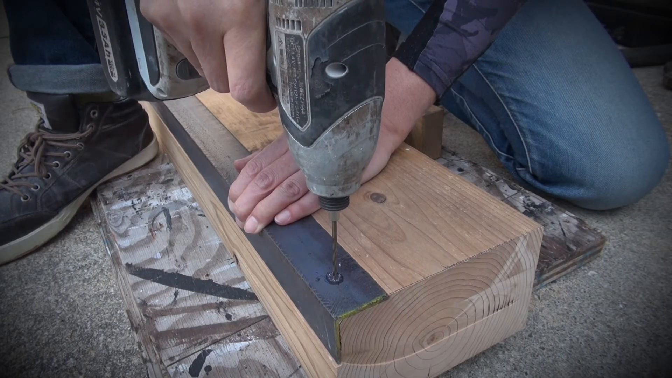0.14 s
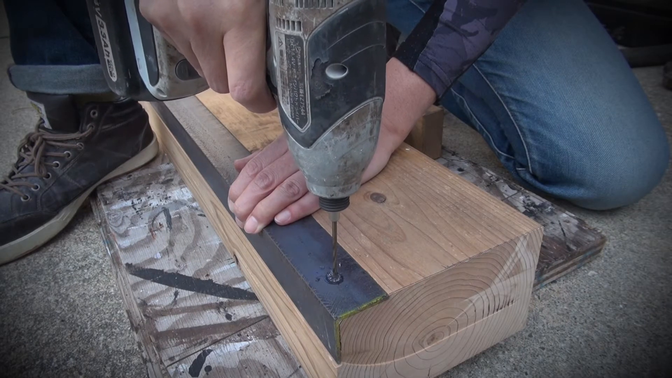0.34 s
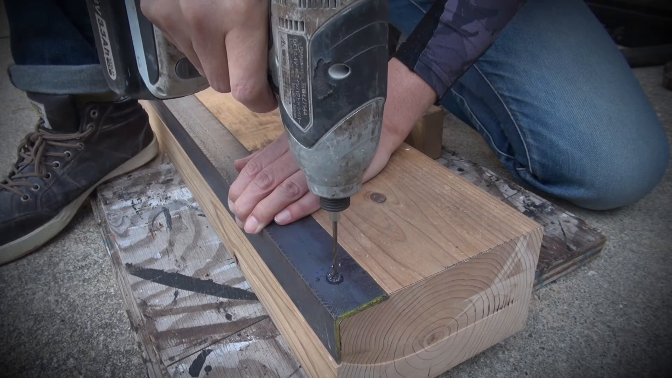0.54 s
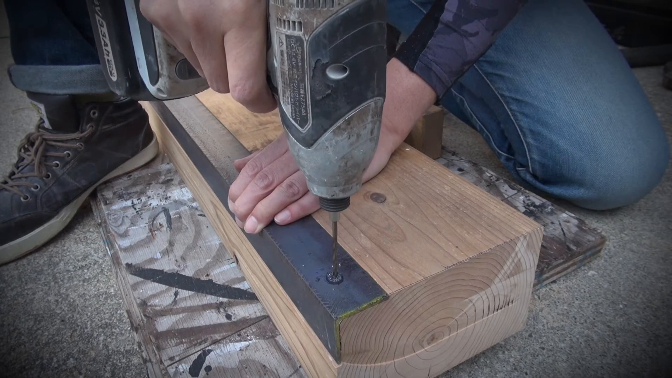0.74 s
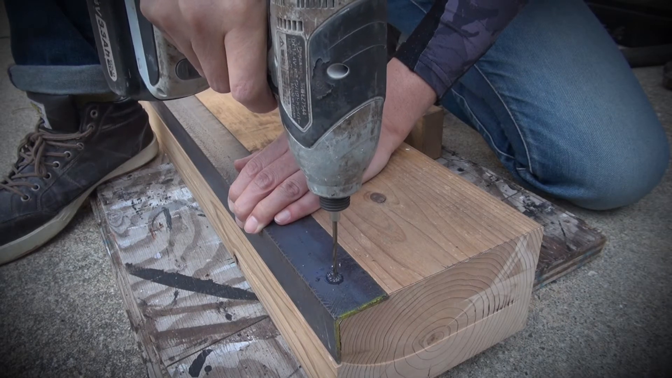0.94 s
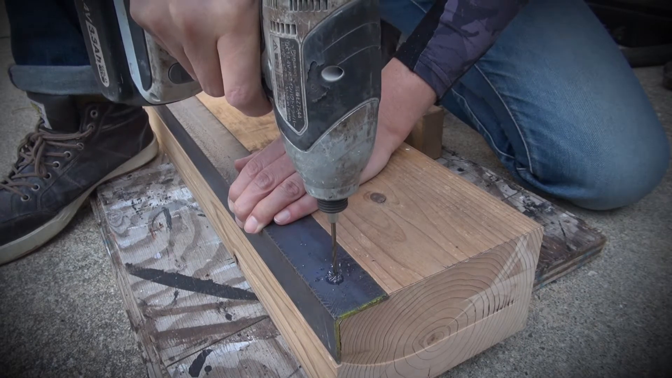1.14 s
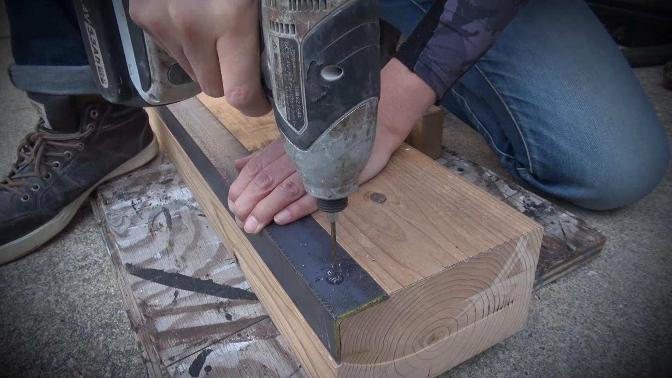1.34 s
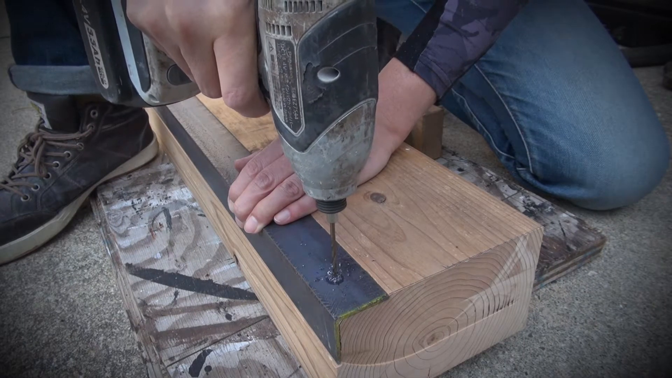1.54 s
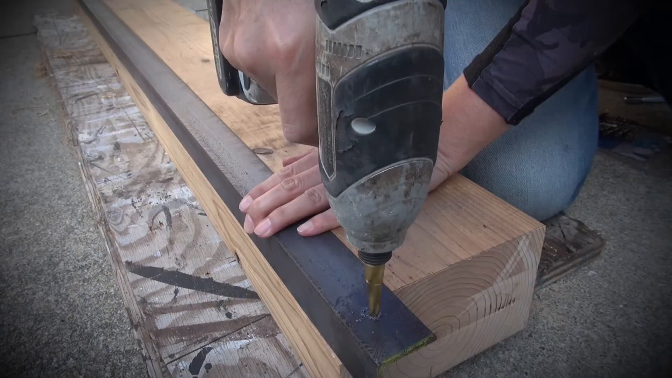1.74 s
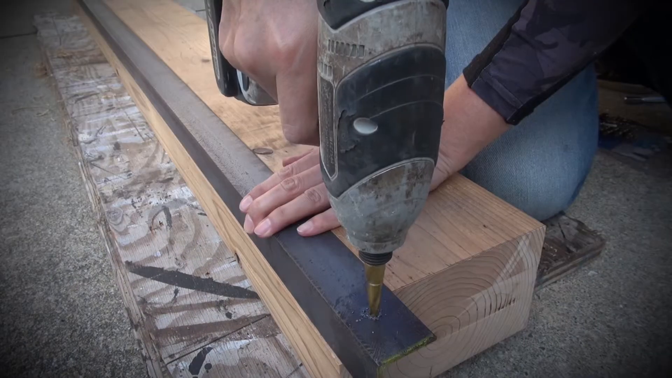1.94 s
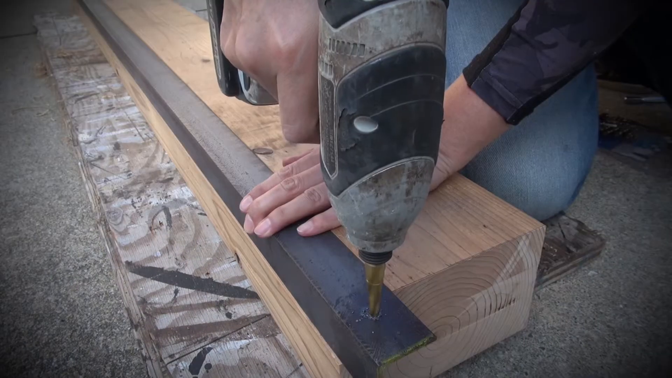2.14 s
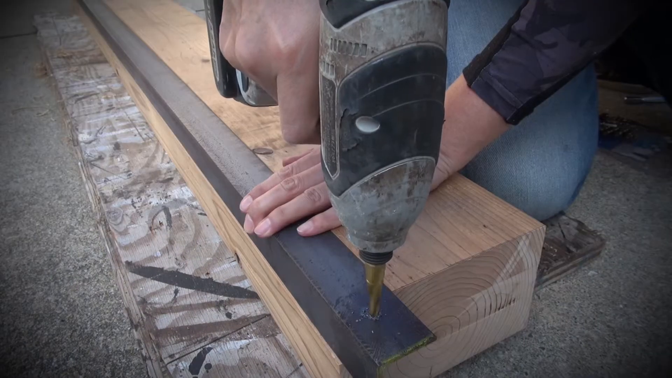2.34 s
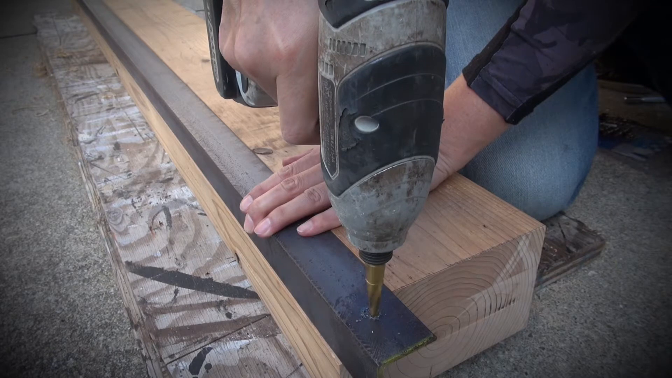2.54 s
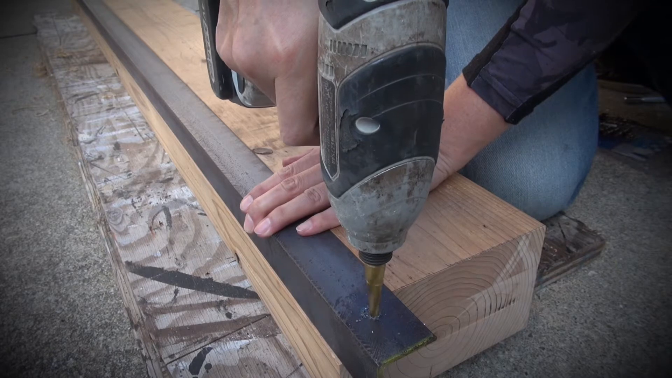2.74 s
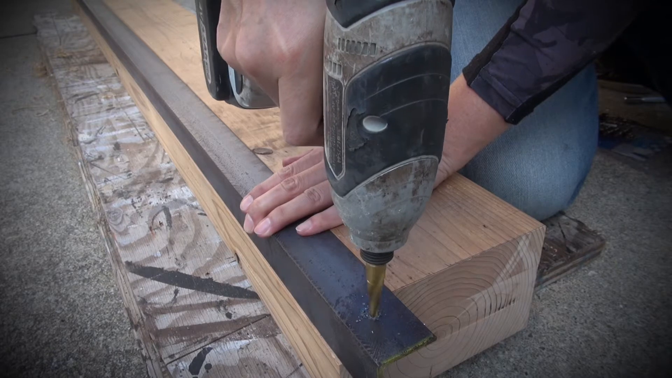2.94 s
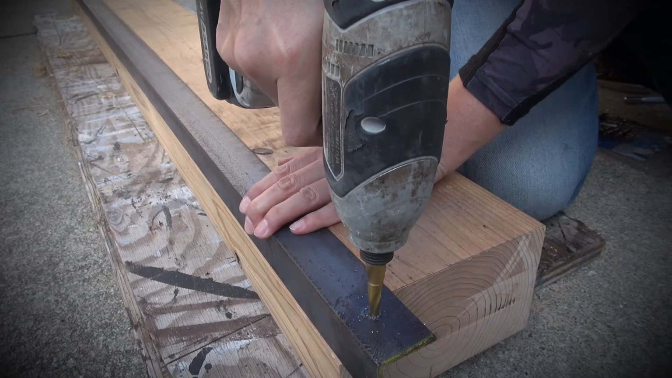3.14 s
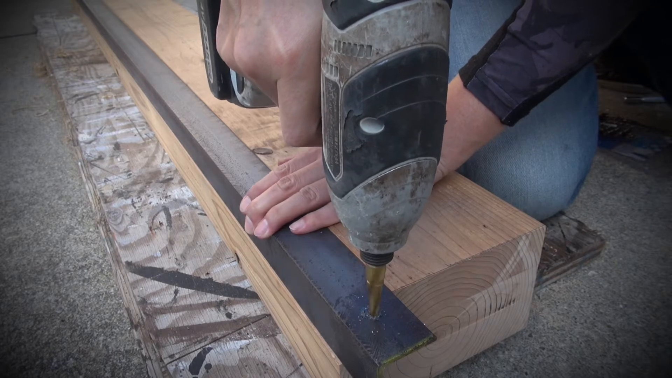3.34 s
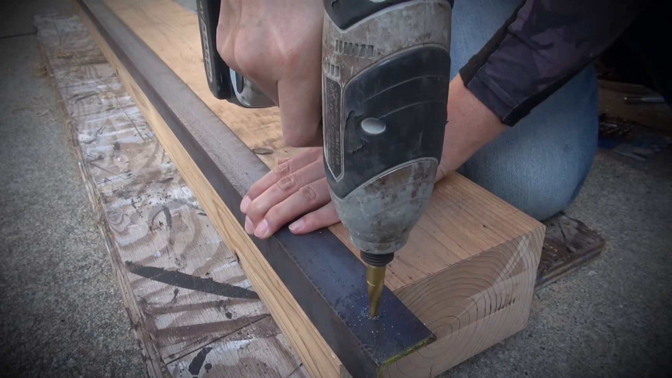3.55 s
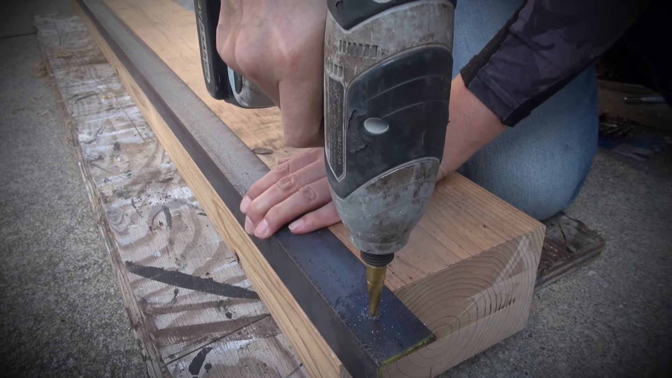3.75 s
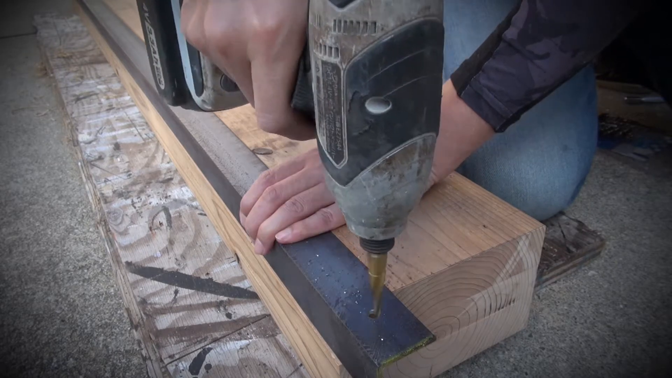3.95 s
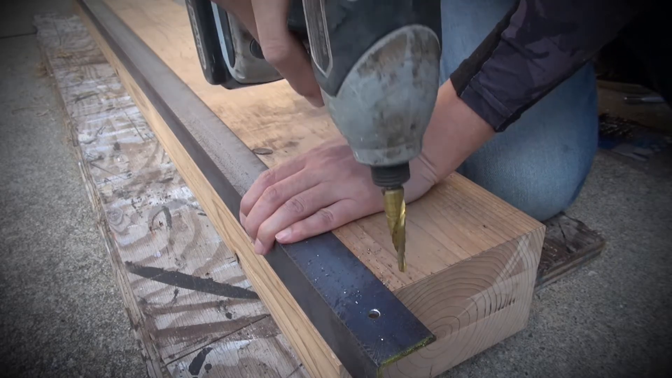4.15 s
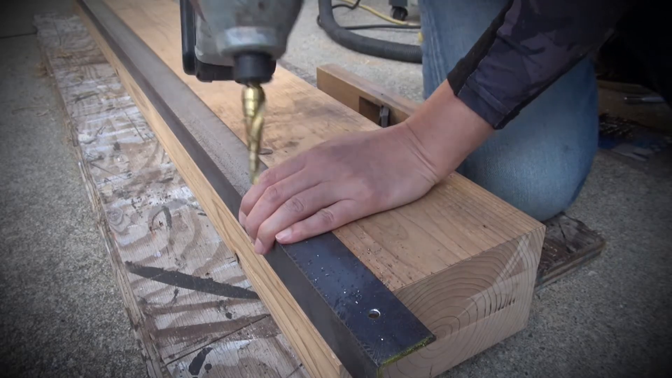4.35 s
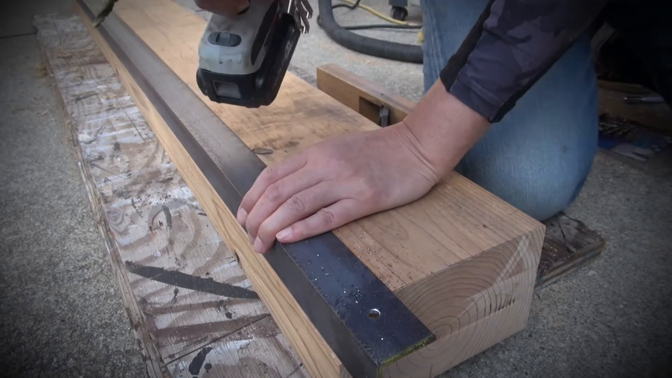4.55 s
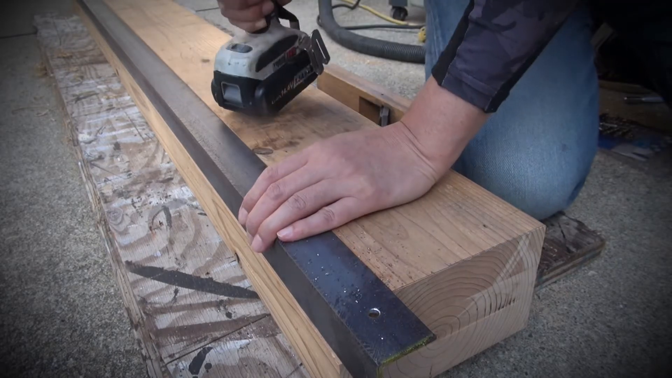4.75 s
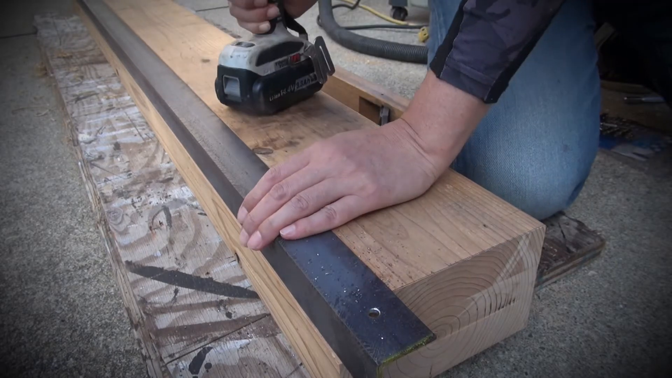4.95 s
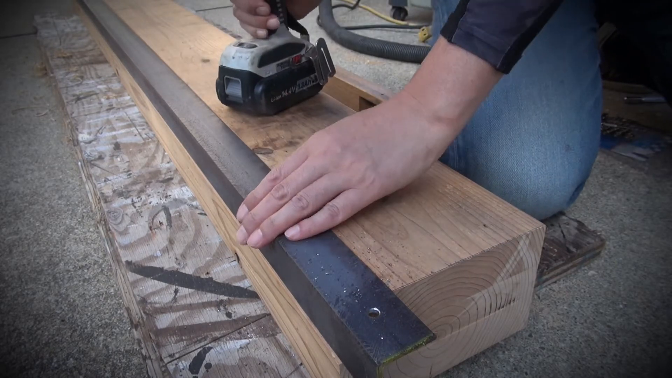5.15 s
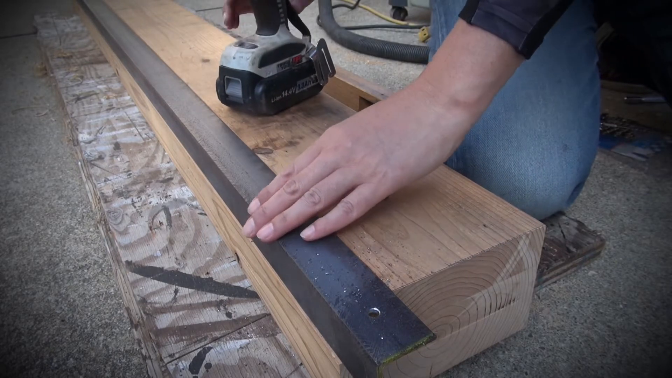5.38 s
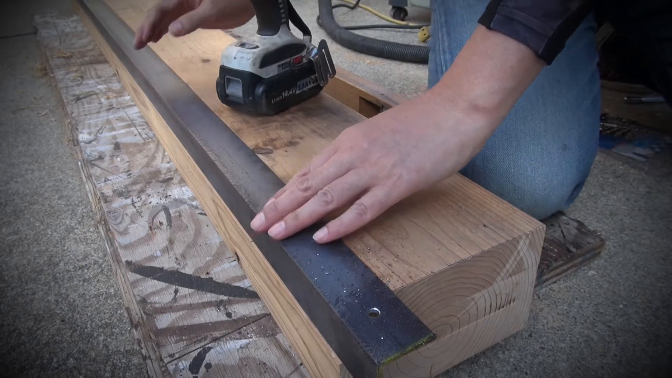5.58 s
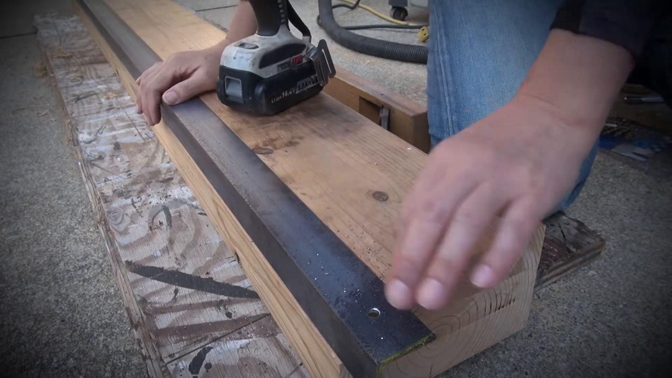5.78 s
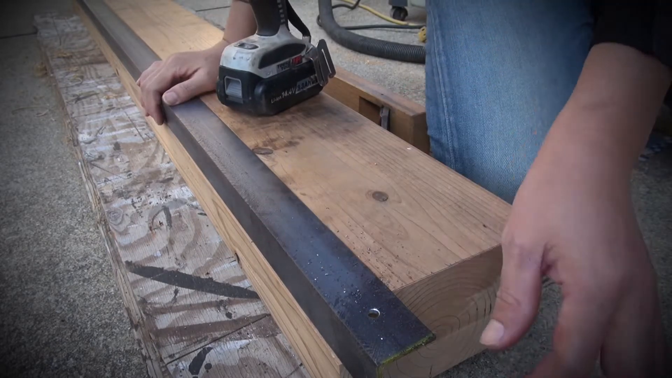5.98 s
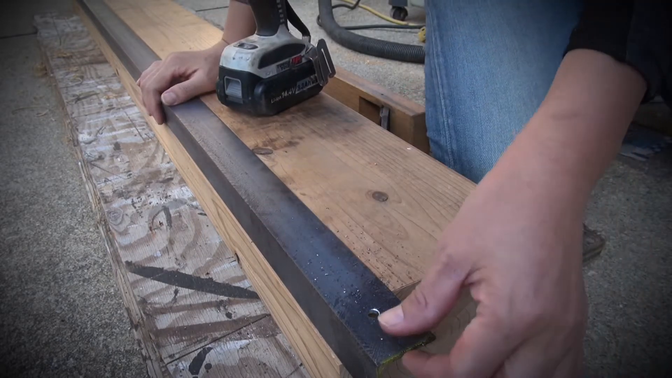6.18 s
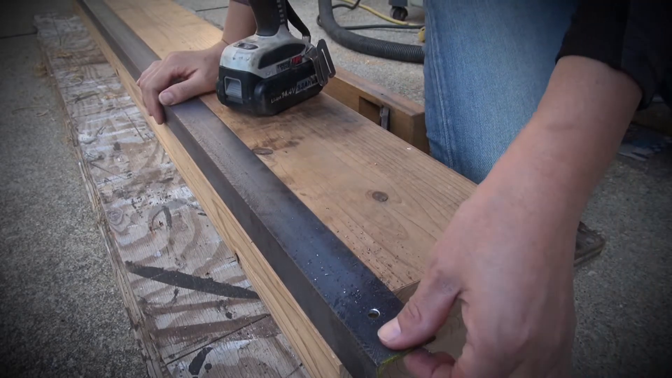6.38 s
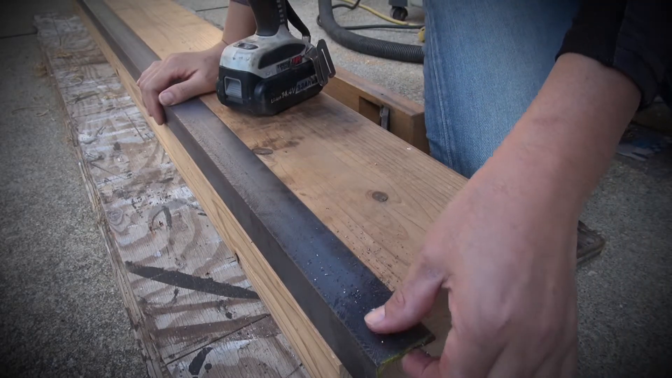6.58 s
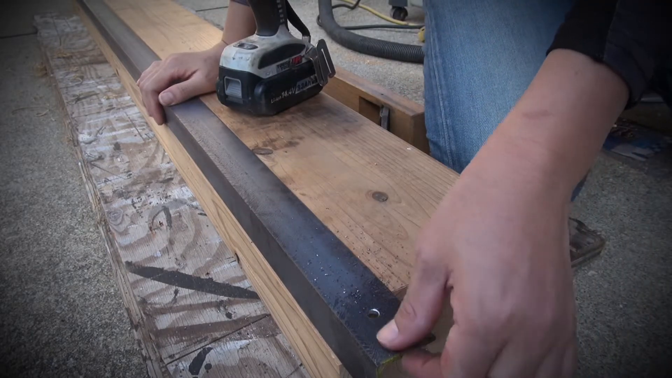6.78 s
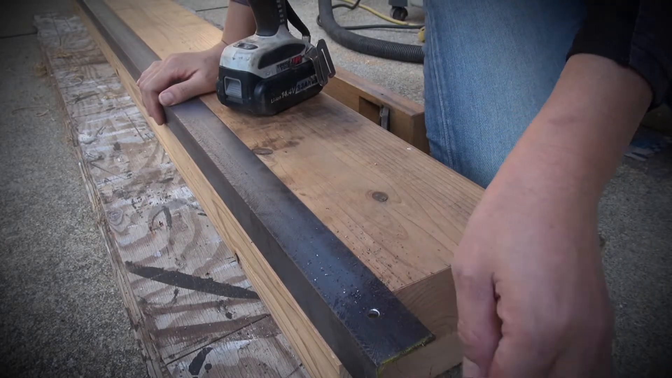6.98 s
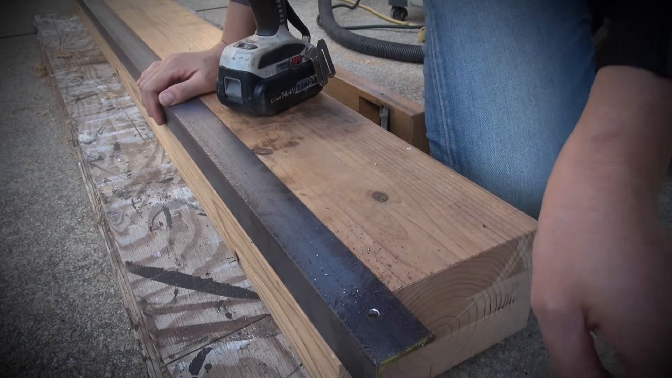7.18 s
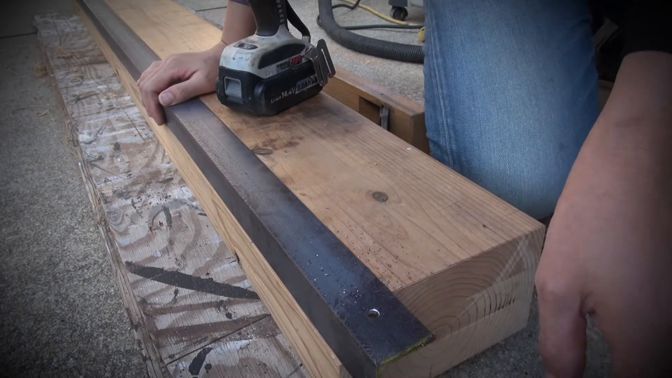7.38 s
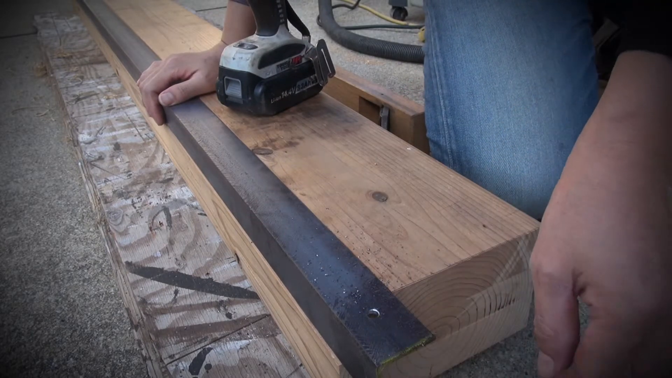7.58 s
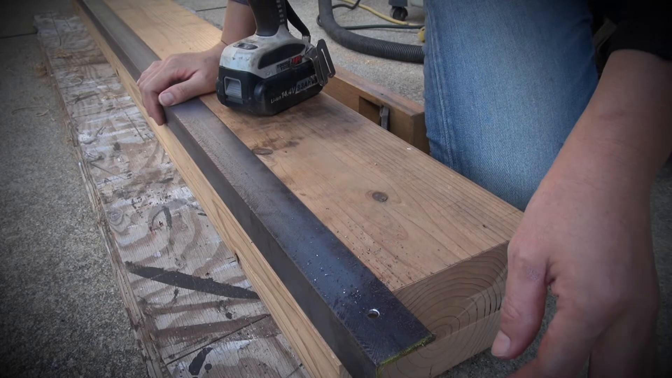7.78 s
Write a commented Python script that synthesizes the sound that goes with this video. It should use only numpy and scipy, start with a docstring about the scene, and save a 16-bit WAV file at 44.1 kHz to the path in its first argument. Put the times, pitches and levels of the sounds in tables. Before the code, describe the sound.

A cordless drill bores into a steel angle on a plank, close to the microphone in a yard, with a steady gear whine and hissing chips. It abruptly spins up again with a rougher bit, labours, chatters through the hole and brakes with a clack. The drill is set down with a few knocks and a small metallic tinkle. Hands brush faintly over the steel as a low outdoor rumble comes up.

```python
"""First comes the gear whine and hiss of a cordless drill, close to the microphone in a yard, as a twist bit
tears chips from a steel angle lying on a plank. Then the scene changes: with a step bit the drill spins up,
labours, chatters through the hole and brakes. The drill is set down on its battery with a few knocks and hands
brush over the steel. The background rumble comes up after the drill stops, on a set level curve, much as when a
recorder's automatic gain recovers."""
import sys
import numpy as np
from scipy import signal
from scipy.fft import rfft, irfft, next_fast_len
from scipy.io import wavfile
from scipy.ndimage import uniform_filter1d, map_coordinates

SR = 44100
rng = np.random.default_rng(int(sys.argv[2]) if len(sys.argv) > 2 else 0)


def digitize_waveform(pressure):
    """Quantize a signal to 16-bit integers and store it at the path in sys.argv[1].

    Rows of a 2-D input are taken as channels; values are limited to [-1, 1].
    """
    field = np.atleast_2d(pressure).T
    bounded = np.clip(field, -1, 1)
    quanta = np.round(bounded * 32767).astype(np.int16)
    wavfile.write(sys.argv[1], SR, quanta)


N = 344862
TIME = np.arange(N) / SR
BIT_CHANGE_S, OPENING_S, THROUGH_S, BRAKE_S, STOP_S = 1.638, 2.9, 3.8, 3.975, 4.048
TEETH, MOTOR_ORDER = 50, 99.43  # gear mesh and motor whine cycles per turn of the chuck


def drill(full_whine_hz=1280):
    """The drill, close up: one shaft angle drives both the gears and the cutting edges."""
    mesh_hz, bind, surge = drive()
    turn = 2 * np.pi * np.cumsum(mesh_hz * (1 + 0.001497 * wobble(25))) / (TEETH * SR)
    slow_fade = np.minimum(mesh_hz / full_whine_hz, 1) ** 4
    stopped_s = np.maximum(TIME - STOP_S, 0)
    release = np.maximum(amp(-753 * stopped_s), amp(-27.5 - 123 * stopped_s))  # fast fall, faint tail
    return release * (slow_fade * gearbox(turn, bind, surge) + cutting(turn))


# Gear mesh rate with each bit at work: t/s, f/Hz
TWIST_MESH = [(0, 1812), (.35, 1797), (.9, 1791), (1.1, 1751), (1.63, 1755)]
STEP_MESH = [(1.97, 1790), (2.08, 1860), (2.25, 1875), (2.55, 1840), (2.97, 1695), (3.5, 1704),
             (3.66, 1665), (3.79, 1660), (3.82, 1765), (3.92, 1820), (3.97, 1760)]
def drive(spin_hz_per_s=2300, brake_hz_per_s=14000, crawl_hz=402):
    """Mesh rate, bind (0-1, how far the load drags the speed down) and surge (1 in spin-up or braking)."""
    working_hz = per_bit(curves(TWIST_MESH)[0], curves(STEP_MESH)[0])
    spin_up_hz = per_bit(working_hz, 1010 + spin_hz_per_s * (TIME - BIT_CHANGE_S))  # gradual trigger
    braked_hz = np.maximum(working_hz - brake_hz_per_s * np.maximum(TIME - BRAKE_S, 0), crawl_hz)
    mesh_hz = np.minimum(spin_up_hz, braked_hz)
    surge = uniform_filter1d(1. * (mesh_hz < working_hz), size=512)
    no_load_hz, full_sag_hz = per_bit(1840.7, 1910), per_bit(114, 340)
    bind = np.clip((no_load_hz - mesh_hz) / full_sag_hz, 0, 1) * (1 - surge)
    return mesh_hz, bind, surge


# Gear whine: multiple of the mesh rate, twist bit level/dB, step bit level/dB
GEAR_PARTIALS = [(.5, -10, -26), (1, 2, -5), (2, -5, -7), (3, -0.5, -3), (4, -17, -1.5), (5, -14.5, -14.5)]
# How the drill's shell colours the whine: f/Hz, level/dB
SHELL_RESPONSE = [(500, -11), (900, -7.5), (1280, 3.5), (1550, -1.5), (1800, -6.5), (2400, -6), (3000, 0),
                  (3400, 0), (3850, 3.5), (4300, 6), (5000, -1), (7500, -5.5)]
def gearbox(turn, bind, surge, flute_depth=0.25, catch_db=7, catch_rad=.8):
    """Gear and motor whine, pulsed by the two cutting edges and by the bit catching once a turn."""
    catch = bind * np.cos(turn)
    load = (1 + flute_depth * np.cos(2 * turn)) * amp(catch_db * catch)
    load /= np.sqrt(uniform_filter1d(load ** 2, size=4096))
    # each bite winds up the drive and holds the teeth back a little
    mesh = TEETH * turn + per_bit(0.69, .12) * np.sin(2 * turn) + catch_rad * catch
    # the teeth rattle in their play, most of all while the step bit cuts
    rough = per_bit(.15, .64) * (1 - surge) + .3 * surge
    whine = np.zeros(N)
    for order, twist_db, step_db in GEAR_PARTIALS:
        rattle = rough * (wobble(170) + 1j * wobble(170))
        tooth = np.real((1 + rattle) * np.exp(1j * order * mesh)) / np.sqrt(1 / 2 + rough ** 2)
        whine += amp(per_bit(twist_db, step_db)) * tooth
    motor = np.sqrt(2) * np.sin(MOTOR_ORDER * turn + rough * wobble(90))
    motor_db = per_bit(-31.5, -61) + per_bit(-33.5, 18.5) * bind
    motor_db += 8.5 * surge + 15 * (TIME > THROUGH_S)  # sings out in a surge and in the finished hole
    gears = load * whine + amp(per_bit(1.5, -1)) * bind ** 1.02 * squeal(turn)
    gear_db = -40.5 - 0.5 * bind
    return coloured(amp(gear_db) * gears + amp(motor_db) * motor, SHELL_RESPONSE)


def squeal(turn):
    """Once a turn the teeth jam for a few milliseconds: a chirp falling through twice the mesh rate."""
    jam = np.cos(turn + 2 + .1 * wobble(30)) - 1
    burst = np.exp(9 * jam) * amp(14 + 1.2 * wobble(30))
    return burst * np.sin(2 * (TEETH + 2) * turn + 9 * jam + .8 * wobble(500))


# Spectra of each bit's chip hiss and lower scrape: f/Hz, level/dB
TWIST_CHIPS = [(1800, -41), (2600, -30), (3100, -8.5), (3500, -7.5), (4200, -4), (5200, -1.5), (6000, -5),
               (6900, -2.5), (7600, -6.5), (9450, -21.5), (11700, -12.5), (13200, -23), (15600, -36.5)]
STEP_CHIPS = [(1530, -32), (2600, -8.5), (3070, -1), (3330, -3.5), (3810, 1.5), (4730, 1), (5100, 0),
              (6150, 0), (6830, 0.5), (7310, -1), (9650, -18), (11500, -10), (15600, -36)]
TWIST_SCRAPE = [(100, -20), (300, -12), (550, -10), (750, -6), (1050, -4.5), (1250, 2.5), (1900, 1.5),
                (2400, -2.5), (2800, 2), (3400, -38)]
STEP_SCRAPE = [(150, -21), (400, -14), (700, 1.5), (1100, 1), (1400, 3), (1900, 1), (2230, 5), (2500, 2.5),
               (2800, 0), (3400, -25)]
# The edges snag on the way through: t/s, hiss level/dB, scrape level/dB
SNAGS = [(3.801, -29.5, -35.5), (3.846, -31.5, -35.5), (3.902, -26, -29), (3.925, -33, -39),
         (3.951, -33, -45), (3.977, -35, -61), (3.992, -28, -38), (4.036, -52, -40)]
def cutting(turn):
    """At the tip the edges tear chips from the steel, ease as the hole opens, then chatter through."""
    opened = np.clip((TIME - OPENING_S) / 0.34, 0, 1)
    hiss = amp(per_bit(-32.5, -33) - 0.5 * opened + 1 * (TIME > THROUGH_S))
    hand_pressure_db = wobble(6.99)
    grind = amp(per_bit(-43.5, -39) - 4 * opened + hand_pressure_db)
    bite = (1 + 0.021 * np.cos(2 * turn) + 0.034 * np.cos(turn)) * amp(0.31 * wobble(70))
    chips = per_bit(step=noise(STEP_CHIPS, grain_db=1.8), twist=noise(TWIST_CHIPS, grain_db=1.8))
    scrape = per_bit(step=noise(STEP_SCRAPE, grain_db=3), twist=noise(TWIST_SCRAPE, grain_db=1.5))
    times, hiss_db, scrape_db = np.transpose(SNAGS)
    snags = strikes(times, hiss_db, t60=0.1) * chips + strikes(times, scrape_db, t60=0.1) * scrape
    return bite * (hiss * chips + grind * scrape) + snags + workpiece()


# Course of the angle's hum and of the plank's groan: t/s, relative level/dB
ANGLE_HUM = [(1.66, -51), (1.77, -44), (1.88, -53), (2.26, -42.5), (2.42, -58), (2.48, -44), (3.04, -50.5),
             (3.08, -44), (3.32, -64), (3.51, -48), (3.57, -67), (3.94, -50)]
PLANK_GROAN = [(1.66, -51.5), (1.68, -50), (2.75, -52.5), (3.27, -45), (3.31, -50), (3.88, -56.5),
               (3.92, -50), (3.97, -59)]
# Spectrum of the shaken plank: f/Hz, level/dB
PLANK_SPECTRUM = [(100, -53), (230, -8), (320, 1.5), (480, -2), (600, 2), (900, -29.5)]
def workpiece(bending_hz=605, hum_db=1, groan_db=2.5):
    """Right under the drill, the wide step bit shakes the steel angle and the plank."""
    # the angle is kicked at random, so its one strong mode drifts in phase and strength
    bending = unit(amp(2.2 * wobble(35)) * np.sin(2 * np.pi * bending_hz * TIME + wobble(22)))
    hum = amp(curves(ANGLE_HUM)[0] + hum_db) * bending
    groan = amp(curves(PLANK_GROAN)[0] + groan_db) * noise(PLANK_SPECTRUM, grain_db=5)
    return (hum + groan) * ((TIME > BIT_CHANGE_S) & (TIME < BRAKE_S))


# Knocks and finger taps: t/s, then relative level/dB of the case, the metal ring and the crack
CONTACTS = [(4.048, -39.5, -53, -31), (4.185, -75, -56, -55), (4.5108, -70, -60, -54),
            (4.717, -23, -46.5, -27), (4.8459, -22, -34, -24), (4.951, -38, -62, -48),
            (4.961, -38, -35.5, -34.5), (5.033, -60, -65, -46), (5.048, -54, -60, -47),
            (5.142, -56, -66, -45), (5.774, -62, -74, -51), (5.875, -56, -72, -47), (7.2053, -62, -70, -50)]
# Modes of the battery case on the plank and of the loose bit in its holder: f/Hz, level/dB, t60/s
CASE_MODES = [(245, -13, 0.051), (312, -11, 0.081), (393, -10, 0.042), (530, -7.5, 0.041),
              (678, -0.5, 0.036), (830, 2, 0.029), (1030, -6.5, 0.026), (1370, -1.5, 0.028),
              (1820, -14, 0.027), (2560, -17, 0.027), (3200, -3.5, 0.021), (3500, -7, 0.017),
              (3970, -8, 0.018), (4620, -1.5, 0.023), (5550, -17, 0.025)]
BIT_MODES = [(4100, -12, .05), (6750, -3, .04), (7600, 1, 0.066), (7830, -6, .06), (8240, -2, 0.038),
             (13300, -6.5, 0.071), (13480, -10, .03), (14750, -12, .03)]
# Spectrum of a contact's crack: f/Hz, level/dB
CRACK = [(200, -24), (700, 8.5), (3000, 6.0), (6500, 1), (8200, -8.5), (9700, -17), (12000, -16),
         (15500, -28)]
def knocks(modes_db=-6, crack_db=-3.5, contact_s=0.0012, rebound_s=.028):
    """Close by, the brake clacks, the battery lands on the plank, the bit tinkles and fingers tap."""
    out, t = np.zeros(N), np.arange(SR // 10) / SR
    onset = 1 - np.exp(-t / contact_s)
    # every knock makes the loose bit hop and land again
    rebounds = [(s + rebound_s, case - 20, bit - 17, crack - 17) for s, case, bit, crack in CONTACTS]
    contacts = list(CONTACTS) + rebounds
    for s, case_db, bit_db, _ in contacts:
        case = amp(case_db + modes_db) * ring(CASE_MODES, t)
        bit = amp(bit_db + modes_db) * ring(BIT_MODES, t)
        start = round(s * SR)
        out[start:start + len(t)] += onset * (case + bit)
    times, _, _, levels_db = np.transpose(contacts)
    cracks = uniform_filter1d(strikes(times, levels_db, t60=0.047), size=48)
    return out + amp(crack_db) * cracks * noise(CRACK, grain_db=2)


# Strokes of hands and sleeves, and of a thumb on the angle's end: t/s, length/s, level/dB
HAND_STROKES = [(4.38, 0.46, -69), (4.76, 0.34, -63), (5.33, 0.11, -62), (5.54, 0.27, -60), (6.22, .3, -69),
                (6.76, 0.13, -61)]
THUMB_STROKES = [(6.17, .24, -68), (6.34, .06, -67)]
# Spectrum of sliding skin and cloth: f/Hz, level/dB
SLIDE_SPECTRUM = [(1500, -4.5), (3500, -2.5), (6800, -2), (8200, -6.5), (9700, -18), (11700, -10),
                  (15000, -26)]
# Resonances of the steel's edge: f/Hz, width/Hz, level/dB
EDGE_MODES = [(5260, 320, 6), (12000, 600, -12)]
def hands(rustle_from_s=4.2):
    """Near the microphone, skin and cloth slide over the work; a thumb makes the edge sing faintly."""
    rustle = amp(-73.5 + 2.5 * wobble(4.6)) * (TIME > rustle_from_s)
    brushing = np.hypot(strokes(HAND_STROKES), rustle) * noise(SLIDE_SPECTRUM, grain_db=2)
    return brushing + strokes(THUMB_STROKES) * rubbed(EDGE_MODES)


# Course of the background: t/s, then relative level/dB of the rumble and of the air
AMBIENCE = [(4.15, -65.5, -63), (5.2, -62.5, -57.5), (5.63, -58, -55), (6.08, -52, -53), (6.23, -53, -53.5),
            (6.58, -55, -54), (7.03, -60, -56.5), (7.48, -56, -55), (7.8, -57, -53.5)]
# Spectra of the rumble and of the air: f/Hz, level/dB
RUMBLE_SPECTRUM = [(25, -10.5), (40, -13), (60, -20.5), (80, -9), (103, 4.5), (118, 1.5), (138, -6.5),
                   (167, 1), (205, -1.5), (250, -15), (330, -18), (450, -55)]
AIR_SPECTRUM = [(150, -14), (250, 1), (310, 1), (390, 1), (500, -1.5), (660, -1.5), (910, -5), (1170, -9),
                (1620, -6), (2150, -13.5), (3200, -17), (5300, -26.5), (9700, -41), (15600, -47)]
def outdoors(rumble_db=6, air_db=3):
    """Background rumble and air come up after the drill stops, as if the recorder's gain recovered."""
    low_db, wash_db = curves(AMBIENCE) + per_bit(-14, -2) * (TIME < STOP_S)
    rumble = amp(low_db + rumble_db + .7 * wobble(14)) * noise(RUMBLE_SPECTRUM)
    air = amp(wash_db + air_db + 0.79 * wobble(7.9)) * noise(AIR_SPECTRUM)
    return rumble + air


# Reverberation of the yard: f/Hz, t60/s
YARD_DECAY = [(200, 0.25), (2000, 0.23), (6000, 0.17), (13000, 0.14)]
def yard(x):
    """A short answer from the concrete and nearby walls, reaching the microphone 5 ms late."""
    hz, t, spectra = signal.stft(rng.standard_normal(SR // 2), SR, nperseg=256)
    decay = amp(-60 * t / along(YARD_DECAY, hz)[:, None])
    tail = signal.istft(spectra * decay, SR, nperseg=256)[1]
    return signal.fftconvolve(x, np.pad(tail / np.linalg.norm(tail), (SR // 200, 0)))[:N]


def spread(mid, width):
    """Mid and side to left and right: only scattered sound differs between the channels."""
    side = coloured(yard(mid), width)
    return np.array([mid + side, mid - side])


def per_bit(twist, step):
    """The twist bit's value until the bit changes, then the step bit's."""
    return np.where(TIME > BIT_CHANGE_S, step, twist)


def strikes(times, levels_db, t60):
    """Envelope of sudden blows that die away."""
    blows = np.zeros(N)
    blows[np.round(times * SR).astype(int)] = amp(levels_db)
    return signal.lfilter([1], [1, -amp(-60 / (t60 * SR))], blows)


def ring(modes, t, scatter_db=4.5):
    """One blow on a set of modes, each at a random strength and sign."""
    out = np.zeros(len(t))
    for hz, db, t60 in modes:
        envelope = amp(db + scatter_db * rng.standard_normal() - 60 * t / t60)
        out += envelope * rng.choice([-1, 1]) * np.sin(2 * np.pi * hz * t)
    return out


def strokes(rows, rise_share=0.16):
    """Envelope of sliding touches: each presses down quickly and eases off."""
    return sum(amp(db) * np.sqrt(np.interp((TIME - s) / length, [0, rise_share, 1], [0, 1, 0]))
               for s, length, db in rows)


def rubbed(modes):
    """Resonances kept ringing by friction, rms 1."""
    def response(hz):
        return sum(amp(db) * (1j * hz * width / (centre ** 2 - hz ** 2 + 1j * hz * width)) ** 2
                   for centre, width, db in modes)
    return unit(filtered(rng.standard_normal(N), response))


def noise(spectrum, grain_db=0):
    """Coloured noise of rms 1; grain_db breaks it into millisecond bursts."""
    bursts = rng.standard_normal(N) * amp(grain_db * np.minimum(wobble(1000), 2))
    return unit(coloured(bursts, spectrum))


def wobble(rate):
    """A smooth random curve, rate knots a second."""
    return map_coordinates(rng.standard_normal(int(N * rate / SR) + 4), [TIME * rate])


def coloured(x, spectrum):
    """x shaped by points of f/Hz, level/dB."""
    return filtered(x, lambda hz: amp(along(spectrum, hz)))


def filtered(x, response):
    """x through a response given as a function of frequency."""
    size = next_fast_len(N + 8192)
    return irfft(rfft(x, size) * response(np.fft.rfftfreq(size, 1 / SR)), size)[..., :N]


def along(points, hz):
    """Points of f/Hz and value, joined on a log frequency axis."""
    knots_hz, values = np.transpose(points)
    return np.interp(np.log(hz + 1), np.log(knots_hz + 1), values)


def curves(rows):
    """One value per sample for each column after t/s."""
    times, *columns = np.transpose(rows)
    return [np.interp(TIME, times, column) for column in columns]


def amp(db):
    """Decibels to gain."""
    return 10 ** (np.asarray(db) / 20)


def unit(x):
    """Scaled to rms 1."""
    return x / np.sqrt(np.mean(np.abs(x) ** 2) + 1e-20)


# Stereo width of the work and of the background: f/Hz, side level/dB
NEAR_WIDTH = [(60, -21), (200, -22.5), (380, -21), (700, -17), (1400, -26.5), (3000, -28), (5000, -23.5),
              (9000, -13.5), (12000, -41)]
FAR_WIDTH = [(110, -46), (200, -40), (380, -23), (700, -16.5), (1300, -15), (8000, -11.5), (13000, -16)]
def scene():
    """The work sits close to the microphone and in the middle; the outdoors lies wider around it."""
    near = drill() + knocks() + hands()
    return spread(near + amp(-15.5) * yard(near), NEAR_WIDTH) + spread(outdoors(), FAR_WIDTH)


def record(dry, top_hz=15750):
    """The camera keeps nothing above its band limit."""
    return filtered(dry, lambda hz: hz < top_hz)


dry = scene()
out = record(dry)
digitize_waveform(out)
```